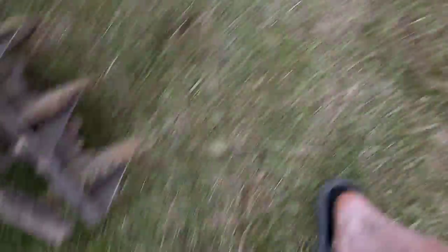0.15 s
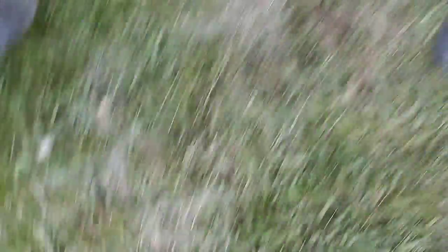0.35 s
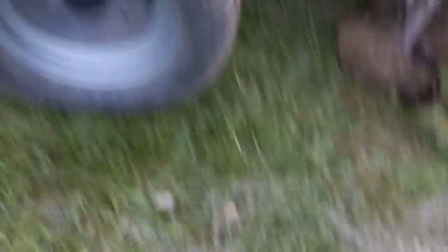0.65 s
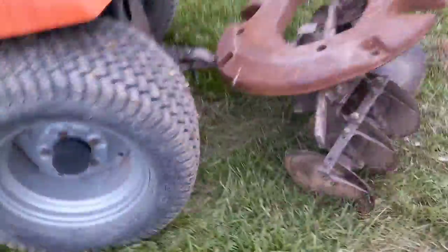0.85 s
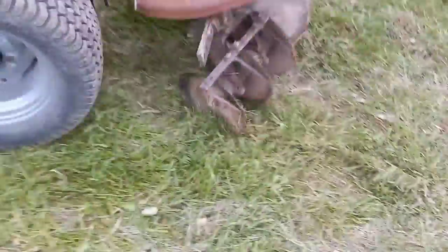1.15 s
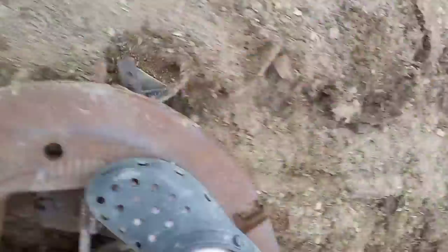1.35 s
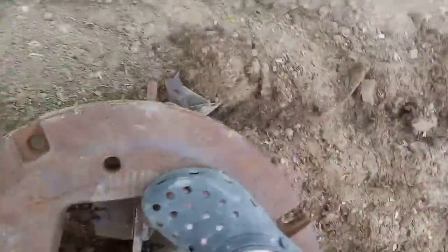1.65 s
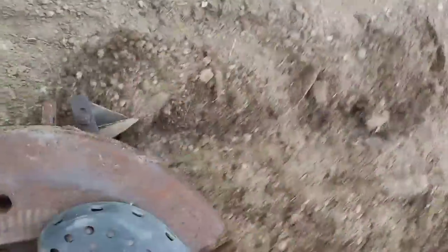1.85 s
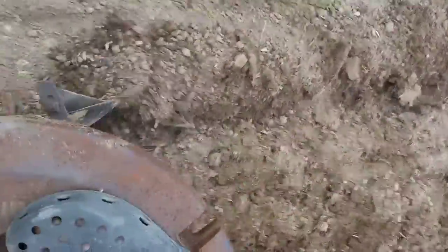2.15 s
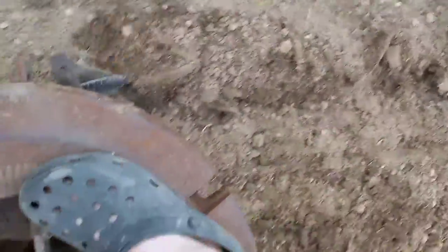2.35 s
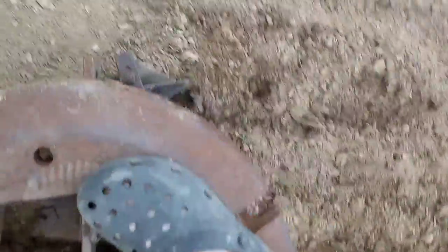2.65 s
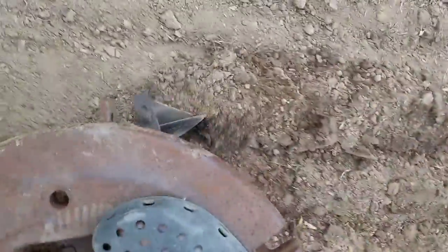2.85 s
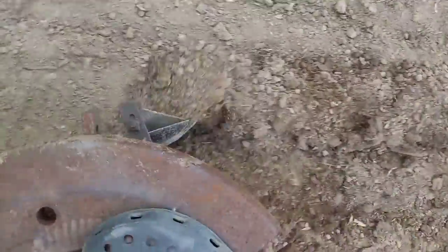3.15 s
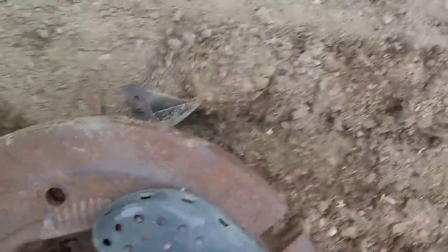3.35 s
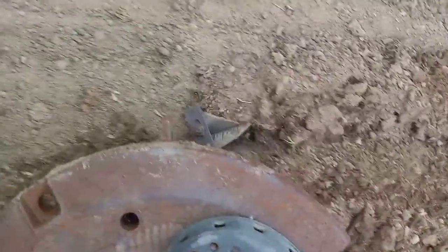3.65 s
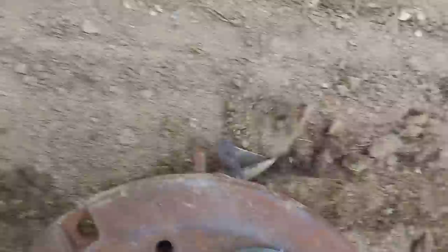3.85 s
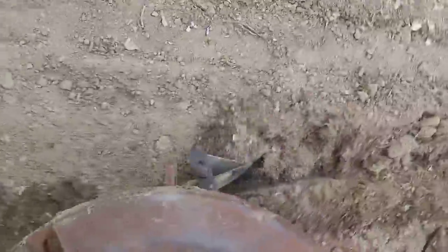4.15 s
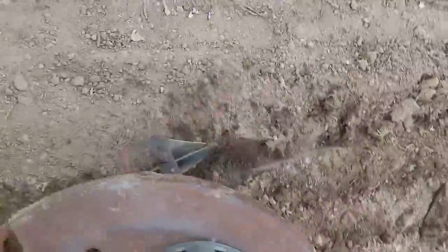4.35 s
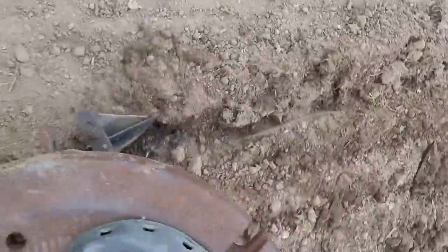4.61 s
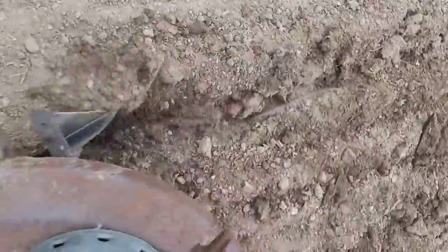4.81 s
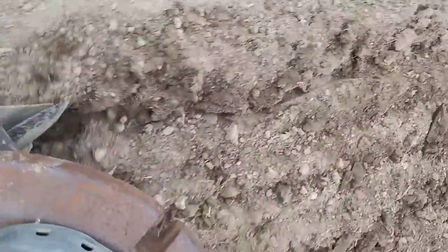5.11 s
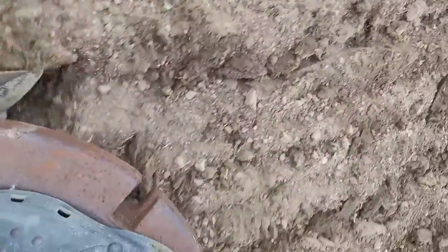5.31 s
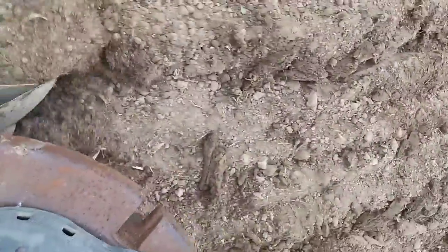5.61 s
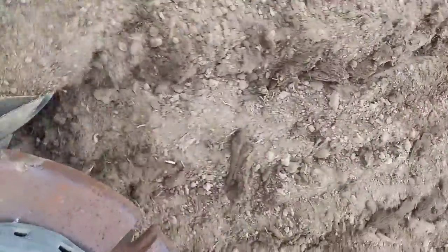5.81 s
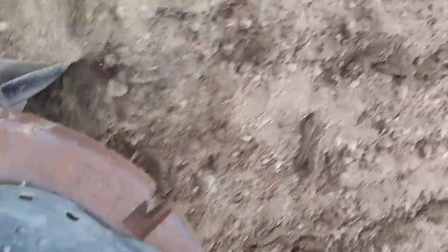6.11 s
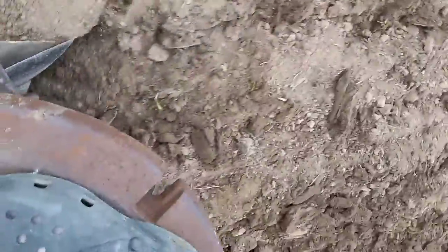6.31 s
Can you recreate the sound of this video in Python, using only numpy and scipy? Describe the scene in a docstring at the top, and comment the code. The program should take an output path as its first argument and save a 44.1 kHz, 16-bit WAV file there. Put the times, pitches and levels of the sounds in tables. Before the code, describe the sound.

A lawn tractor chugs at part throttle, then suddenly drones at full speed with tinny rattling and a hiss of soil.

```python
"""On a lawn, a V-twin tractor is heard from the grass beside it at part throttle, then, after a sudden
cut, from the implement it tows at full speed. Unevenly spaced firings thump through the muffler.
The fan, valve gear and soil hiss, and loose parts knock on tin panels and make them ring. Rattles
come and go, with a few snaps and one soft thud. The right microphone is a hand's width further
from the engine than the left, so it hears the engine slightly later."""
import sys
import numpy as np
from scipy import signal
from scipy.fft import rfft, irfft, next_fast_len
from scipy.io import wavfile
from scipy.ndimage import uniform_filter1d

SR = 44100
rng = np.random.default_rng(int(sys.argv[2]) if len(sys.argv) > 2 else 0)


def wrap_up_sound(samples):
    """Save the sound to the file named by the first command line argument, as 16-bit audio."""
    columns = np.atleast_2d(samples).T
    # keep every value between -1 and 1, then stretch to whole-number steps
    tamed = np.clip(columns, -1, 1)
    steps = np.round(tamed * 32767).astype(np.int16)
    wavfile.write(sys.argv[1], SR, steps)


N = 285327

# BESIDE is the place on the grass; RIDING is the place on the towed implement.
# How the muffler and the ground colour the exhaust: f/Hz, relative level/dB
BESIDE_MUFFLER = [(30, -54), (62, -23), (82, -9), (103, -3), (123, -2), (144, -13.5), (170, -7.5),
                  (215, -6.5), (250, -16.5), (320, -19), (360, -47), (500, -26), (900, -53), (2500, -98)]
RIDING_MUFFLER = [(30, -42), (59, -17.5), (88, -3.5), (147, -2.5), (177, -0.5), (206, -6.5), (236, -10),
                  (265, -9), (295, -8.5), (330, -23), (385, -14), (430, -21), (472, -19.5), (540, -42),
                  (600, -26.5), (690, -25.5), (2000, -98)]
# The colour of the fan, valve gear and soil noise: f/Hz, relative level/dB
BESIDE_HISS = [(30, -21), (70, 7.5), (200, 1), (320, 2), (420, -6), (800, -2), (1200, -6), (1800, -4),
               (3000, -9.5), (5000, -14.5), (5800, -18), (8000, -19.5), (11500, -24), (14000, -23.5),
               (16000, -40)]
RIDING_HISS = [(30, -21), (60, -4.5), (130, -2), (240, -5), (300, 5), (360, 2), (440, -2), (560, -2.5),
               (880, -3.5), (1250, -6.5), (1900, -6.5), (3000, -10), (4500, -15), (5600, -19),
               (8000, -20.5), (11500, -27.5), (14000, -27.5), (16000, -47)]
# The notes of tin panels and covers: f/Hz, width/Hz, level/dB compared with the hiss
BESIDE_PANELS = [(595, 34, -16), (761, 21, -21), (861, 29, -15.5), (1155, 23, -18), (1753, 68, -14.5),
                 (3400, 250, -21)]
RIDING_PANELS = [(324, 24, -14), (596.5, 23, -15.5), (683, 17, -14.5), (862, 28, -11.5), (1437, 26, -17),
                 (1745, 48, -8.5), (1849, 10, -15), (1958, 23, -14.5), (2100, 200, -18.5), (2306, 35, -18),
                 (2572, 12, -17.5), (3440, 100, -18), (3700, 100, -32), (4105, 110, -18.5),
                 (4440, 58, -20.5), (4870, 74, -19.5), (5266, 64, -21), (5690, 68, -26), (6500, 130, -21.5),
                 (7150, 200, -22)]
# Loudness as the listener walks nearer and the implement bites in:
# t/s, exhaust level/dB, machine noise level/dB, upper exhaust boost/dB, rumble boost/dB
BESIDE_LEVELS = [(.03, -20.5, -24, -1, 4), (.13, -19, -25.5, -2, 4.5), (.42, -18, -23, -3, 2),
                 (.52, -16, -23.5, 2, -3), (.68, -17.5, -23, -3, 3), (.8, -18.5, -23, -2, 1),
                 (1.3, -18.5, -24.5, 4, 1.3)]
RIDING_LEVELS = [(1.4, -19, -25.5, -6, 1.2), (1.95, -18.5, -25, -4, -1), (2.25, -18.5, -24.5, 3, 2.2),
                 (2.65, -17, -23.5, 1, 0.5), (3.3, -17, -23.5, 3, 0.6), (3.7, -17, -23.5, -1.5, -1.5),
                 (4.4, -17, -23.5, 0, 1), (4.8, -16.5, -24, 1, -0.5), (5.5, -17, -24, 3, 0.5),
                 (6.45, -16, -23, 0.5, -1.5)]
# How the two microphones compare: f/Hz, right delay/ms, likeness (0 to 1), left minus right/dB
BESIDE_MICS = [(40, 0.7, 1, -1.5), (150, 0.41, 0.83, -0.5), (826, 0.25, 0.98, 1.5), (1480, 0.37, 0.34, -5),
               (2580, 0.33, 0.72, 3), (3380, 0.48, 0.37, 6), (5840, 0.53, 0.07, 1),
               (16000, 0.363, 0.4, 2.5)]
RIDING_MICS = [(50, 0.7, 0.9, 0.074), (150, 0.52, 1, -0.21), (1330, 0.35, 0.75, -0.23),
               (2250, 0.46, 0.8, -0.63), (3160, 0.478, 0.6, 2.1), (4420, 0.528, 0.54, 2.2),
               (5600, 0.528, 0.24, -0.36), (8600, 0.56, 0.36, 0.025), (16000, 0.507, 0.19, 1.2)]
# Swells of rattle, rumble and ringing: middle t/s, length/s, level/dB, f/Hz, width/Hz
RATTLES = [(0.26, 0.6, -30.5, 81, 54), (0.62, 0.25, -27, 322, 14), (0.12, 0.4, -38.5, 3500, 120),
           (.45, .3, -40, 4300, 500), (0.47, 0.37, -35.5, 1780, 160), (0.64, 0.8, -41.5, 4900, 600),
           (0.88, 1.05, -45.5, 12500, 3000), (.1, 0.32, -38.5, 1180, 46), (0.68, 0.16, -36.5, 850, 25),
           (.15, 0.32, -33.5, 340, 120), (4.06, 1.13, -36.5, 700, 140), (1.06, 0.69, -44, 2630, 200),
           (0.96, 0.72, -41, 660, 250), (1.64, 0.4, -38, 3860, 70), (1.7, 0.75, -37.5, 3700, 110),
           (2.7, 0.28, -39.5, 3800, 27), (3.1, 0.6, -42, 1478, 45), (2.96, 0.43, -39, 3400, 63),
           (3.48, 0.36, -39, 3430, 80), (4.07, .25, -40, 3390, 35), (3.4, 1.8, -40, 3720, 100),
           (4.59, 0.86, -38, 3750, 200), (3.1, 0.75, -43.5, 7130, 130), (3.97, 0.5, -43, 7220, 140),
           (4.5, .3, -46, 7400, 60), (4.95, .5, -46, 7150, 90), (5.3, 1.2, -39, 2285, 14),
           (5.1, .7, -40, 2330, 30), (6.35, .3, -38, 2310, 60), (5.4, .35, -39, 1965, 8),
           (6, .6, -41, 1970, 10), (2.2, .7, -41, 1855, 10), (3, .6, -39, 1860, 25),
           (4.2, 1.4, -40, 1848, 10), (4.35, .3, -40, 2290, 12), (5.62, .9, -37, 4120, 140),
           (5, .12, -38, 4150, 100), (6.3, .35, -37.5, 4110, 140), (6.2, 0.55, -46, 7220, 90),
           (6.3, .5, -46, 5330, 90)]
# Snaps and knocks: t/s, starting level/dB, f/Hz, width/Hz, time to fade by 60 dB/s
SNAPS = [(.283, -24, 7400, 1200, 0.057), (.283, -29, 11500, 4000, 0.061), (.284, -18, 1800, 440, 0.034),
         (4.654, -25, 7100, 700, 0.049), (6.19, -21, 1500, 900, 0.06)]
# The machine noise shifts as the microphones turn after the tractor: t/s, left minus right/dB
BESIDE_PAN, RIDING_PAN = [(.3, 0.36), (1.35, -1.8)], [(1.37, 0), (6.47, 0)]

# One engine cycle is two turns of the crankshaft, and each cylinder fires once in it.
# second_at and jitter are fractions of a cycle; shake_lead is a fraction of one crankshaft turn.
BESIDE = dict(
    span_s=(0, 1.35), levels=BESIDE_LEVELS, mics=BESIDE_MICS, pan=BESIDE_PAN,
    speed=dict(cycle_hz=20.54, swing_hz=.43, period_s=.77, fastest_s=.9, start_cycle=.68),
    firing=dict(muffler=BESIDE_MUFFLER, second_at=0.3756, second_db=2.2, jitter=0.0013, scatter_db=-0.1,
                tail_hz=108, tail_width_hz=14, tail_turns=0.08, skew=-0.21,
                shake_db=-38, shake_lead=0.085),
    hiss=dict(colour=BESIDE_HISS, beat=0.039, swell_db=-0.5, flicker_db=1.74),
    tin=dict(panels=BESIDE_PANELS, knocks_per_s=240, spread_db=1.5, flicker_db=4.0, beat=0.21),
    dip=dict(centre_hz=9240, width_hz=1200, db=-6.5))
RIDING = dict(
    span_s=(1.37, 6.47), levels=RIDING_LEVELS, mics=RIDING_MICS, pan=RIDING_PAN,
    speed=dict(cycle_hz=29.448, swing_hz=.15, period_s=.475, fastest_s=3.53, start_cycle=.08),
    firing=dict(muffler=RIDING_MUFFLER, second_at=0.389, second_db=1.6, jitter=0.00086, scatter_db=-0.16,
                tail_hz=150, tail_width_hz=30, tail_turns=0.026, skew=1.32,
                shake_db=-8, shake_lead=0.19),
    hiss=dict(colour=RIDING_HISS, beat=0.023, swell_db=0.45, flicker_db=1.07),
    tin=dict(panels=RIDING_PANELS, knocks_per_s=450, spread_db=1.77, flicker_db=1.24, beat=0.4),
    dip=dict(centre_hz=8880, width_hz=540, db=-27))


def tractor(span_s, levels, mics, pan, speed, firing, hiss, tin, dip):
    """The tractor heard from one place: exhaust and machine noise, both following the engine's speed."""
    lead_in = SR // 4  # spare samples before the span
    count = next_fast_len(int((span_s[1] - span_s[0] + .6) * SR))
    t = np.arange(-lead_in, count - lead_in) / SR + span_s[0]
    times, *columns = np.transpose(levels)
    exhaust_db, noise_db, upper_db, rumble_db = (np.interp(t, times, column) for column in columns)
    pan_db = np.interp(t, *np.transpose(pan))
    cycles = governor(t, **speed)
    pipe = exhaust(cycles, **firing) * gain(exhaust_db)
    pipe += (gain(upper_db) - 1) * (pipe - below(pipe, hz=340))
    noise = (machine_hiss(cycles, **hiss) + tin_panels(cycles, **tin)) * gain(noise_db)
    noise += (gain(rumble_db) - 1) * below(noise, hz=600)
    noise = treble_dip(noise, **dip)
    fully_alike = [(hz, delay, 1, db) for hz, delay, _, db in mics]  # both hear the same exhaust note
    stereo = two_microphones(pipe, np.zeros_like(pipe), fully_alike)
    stereo += two_microphones(noise[0], noise[1:], mics) * gain(np.array([pan_db, -pan_db]) / 2)
    sample = np.round(t * SR).astype(int)
    inside = (sample >= 0) & (sample < N)
    out = np.zeros((2, N))
    out[:, sample[inside]] = stereo[:, inside]
    return out


def exhaust(cycles, muffler, second_at, second_db, jitter, scatter_db,
            tail_hz, tail_width_hz, tail_turns, skew, shake_db, shake_lead):
    """Two slightly irregular firings a cycle pass through the muffler; the frame's shake is added."""
    n = len(cycles)
    whole_cycles = np.arange(1, int(cycles[-1]))
    chance = rng.standard_normal((len(whole_cycles), 2, 2))
    fire_cycles = whole_cycles[:, None] + [0, second_at] + jitter * chance[..., 0]
    fire_samples = np.interp(fire_cycles, cycles, np.arange(n)).astype(int)
    pulses = np.zeros(n)
    np.add.at(pulses, fire_samples, gain([0, second_db] + scatter_db * chance[..., 1]))
    hz = np.fft.rfftfreq(n, 1 / SR)
    chamber_lag = np.pi + 2 * np.arctan((hz - 340) / 17.4)  # a muffler chamber delays sound near 340 Hz
    tail_lag = 2 * tail_turns * np.arctan((hz - tail_hz) / tail_width_hz)  # the tail pipe rings on
    # skew shapes each pulse: 0 is a pressure bump, 1 a dip and a peak, 2 a dip
    response = gain(on_log_axis(hz, muffler)) * np.exp(-1j * (np.pi / 2 * skew + chamber_lag + tail_lag))
    thumps = at_level(irfft(rfft(pulses) * response, n), 0)
    return thumps + gain(shake_db) * frame_shake(2 * cycles + shake_lead)


def frame_shake(turns):
    """The frame shakes once for each turn of the crankshaft, and more weakly twice a turn."""
    angle = 2 * np.pi * turns
    return np.sqrt(2) * (np.cos(angle) + gain(-7) * np.cos(2 * angle + 2 * np.pi * .29))


def governor(t, cycle_hz, swing_hz, period_s, fastest_s, start_cycle):
    """The speed control swings around its set speed. Returns the running count of engine cycles."""
    rate_hz = cycle_hz + swing_hz * np.cos(2 * np.pi * (t - fastest_s) / period_s)
    return np.cumsum(rate_hz) / SR + start_cycle


def machine_hiss(cycles, colour, beat, swell_db, flicker_db):
    """Fan, valve gear and soil hiss in flickering bands. Three rows: shared, left only, right only."""
    n = len(cycles)
    hz = np.maximum(np.fft.rfftfreq(n, 1 / SR), 1)
    spectrum = rfft(rng.standard_normal((3, n)) * crank_beat(cycles, beat))
    swell = swell_db * wander(n, rate_hz=10)
    bands = np.zeros((3, n))
    for octave in np.arange(4.5, 14.6, .5):  # half-octave bands across all of hearing
        band_shape = np.clip(1 - 2 * np.abs(np.log2(hz) - octave), 0, 1)
        bands += gain(swell + flicker_db * wander(n, rate_hz=14)) * irfft(spectrum * band_shape, n)
    return at_level(irfft(rfft(bands) * gain(on_log_axis(hz, colour)), n), 0)


def tin_panels(cycles, panels, knocks_per_s, spread_db, flicker_db, beat):
    """Loose parts knock at random and ring the panels. Three rows: shared, left only, right only."""
    n = len(cycles)
    # the bodywork adds a crowd of high notes, weaker towards the top
    crowd_hz = np.linspace(1650, 5300, 36) * rng.uniform(0.96, 1.03, 36)
    bodywork = [(hz, 35, -22.5 - 7 * (hz / 5300) ** 2) for hz in crowd_hz]
    blows = rng.standard_normal((3, n)) * crank_beat(cycles, beat)
    blows *= gain(spread_db * rng.exponential(size=n))  # most are small, a few are hard
    out = np.zeros((3, n))
    for hz, width, db in list(panels) + bodywork:
        knocks = (rng.random(n) < knocks_per_s / SR) * gain(flicker_db * wander(n, rate_hz=9))
        ringing = ring(ring(knocks * blows, hz, width), hz, 6 * width)
        out += at_level(frame_flex(ringing), db)
    return out


def frame_flex(ringing, drift=.002):
    """A panel's note wanders by a tiny fraction as the frame bends."""
    n = ringing.shape[-1]
    position = np.clip(np.arange(n) + drift * np.cumsum(wander(n, rate_hz=2)), 0, n - 2)
    whole = position.astype(int)
    return ringing[:, whole] + (position - whole) * (ringing[:, whole + 1] - ringing[:, whole])


def rattles(t, knocks_per_s=600, spread_db=1.5, stereo_width=0.6):
    """Showers of tiny knocks swell and fade, each shower ringing in one narrow band."""
    out = np.zeros((2, N))
    blows = rng.standard_normal((2, N)) * gain(spread_db * rng.exponential(size=N))
    for middle_s, length_s, db, hz, width in RATTLES:
        knocks = (rng.random(N) < knocks_per_s / SR) * blows
        near = np.abs(t - middle_s) < 2 * length_s
        swell = np.exp(-((t[near] - middle_s) / (length_s / 2)) ** 4)
        centre, side = ring(ring(knocks[:, near], hz, width), hz, 3 * width) * swell
        scale = gain(db) * np.sqrt(np.sum(swell ** 2) / np.sum(centre ** 2))
        out[:, near] += scale * (centre + stereo_width * np.outer([1, -1], side))
    return out


def snaps(t):
    """Bursts of noise, each in its own band, that start sharply and die away fast."""
    out = np.zeros((2, N))
    for start_s, db, hz, width, fade_s in SNAPS:
        decay = (t >= start_s) * gain(-60 * np.maximum(t - start_s, 0) / fade_s)
        burst = ring(ring(rng.standard_normal((2, N)), hz, width), hz, width)
        out += at_level(burst, db) * decay
    return out


def thud(t, middle_s=.33, length_s=.13, db=-21, hz=78):
    """One soft thud: a low note that swells and fades."""
    swell = np.exp(-((t - middle_s) / (length_s / 2)) ** 2)
    return gain(db) * np.sqrt(2) * swell * np.sin(2 * np.pi * hz * t)


def two_microphones(shared, own, mics):
    """The right microphone hears the shared sound late; each also picks up sound of its own."""
    hz = np.fft.rfftfreq(len(shared), 1 / SR)
    likeness = np.clip(on_log_axis(hz, mics, column=2), 0, 1)
    delay = np.exp(-2j * np.pi * hz * on_log_axis(hz, mics) / 1000)
    arrivals = rfft(shared) * np.array([np.ones_like(delay), delay])
    both = np.sqrt(likeness) * arrivals + np.sqrt(1 - likeness) * rfft(own)
    balance = gain(np.outer([.5, -.5], on_log_axis(hz, mics, column=3)))
    return irfft(both * balance, len(shared))


def treble_dip(x, centre_hz, width_hz, db):
    """Turns down one band of the high treble."""
    hz = np.fft.rfftfreq(x.shape[-1], 1 / SR)
    return irfft(rfft(x) * gain(db * np.exp(-((hz - centre_hz) / width_hz) ** 4)), x.shape[-1])


def crank_beat(cycles, depth):
    """A rise and fall in strength, once for each turn of the crankshaft."""
    return 1 + depth * np.cos(4 * np.pi * cycles)


def ring(x, hz, width_hz):
    """Lets a sound ring at one pitch."""
    return signal.lfilter(*signal.iirpeak(min(hz, .45 * SR), hz / width_hz, fs=SR), x)


def below(x, hz):
    """The part of a sound under a frequency, with no delay."""
    return signal.sosfiltfilt(signal.butter(6, hz, fs=SR, output="sos"), x)


def wander(n, rate_hz):
    """A smooth random curve that typically strays about 1 from zero."""
    hold = int(SR / rate_hz)
    steps = np.repeat(rng.standard_normal(n // hold + 1), hold)
    return 1.52 * uniform_filter1d(uniform_filter1d(steps, hold), hold)[:n]


def on_log_axis(hz, table, column=1):
    """Reads between a table's rows, giving every octave equal room."""
    table = np.array(table)
    return np.interp(np.log(np.maximum(hz, 1)), np.log(table[:, 0]), table[:, column])


def gain(db):
    """Turns decibels into a number to multiply by."""
    return 10 ** (np.asarray(db) / 20)


def at_level(x, db):
    """Scales a sound to an average (RMS) level."""
    return x * gain(db) / np.sqrt(np.mean(x ** 2))


def scene():
    """The tractor fades out quickly in one place and in again at the other; small sounds lie on top."""
    t = np.arange(N) / SR
    cut_s, half_gap_s, fade_s = 1.359, 0.00068, 0.0074
    beside = tractor(**BESIDE) * np.clip((cut_s - t - half_gap_s) / fade_s, 0, 1)
    riding = tractor(**RIDING) * np.clip((t - cut_s - half_gap_s) / fade_s, 0, 1)
    return beside + riding + snaps(t) + thud(t) + rattles(t)


def record(dry):
    """The preamplifier rounds off the peaks, and the treble above 15450 Hz is cut steeply."""
    return signal.sosfilt(signal.ellip(12, .3, 60, 15450, fs=SR, output="sos"), np.tanh(dry))


dry = scene()
out = record(dry)
wrap_up_sound(out)
```